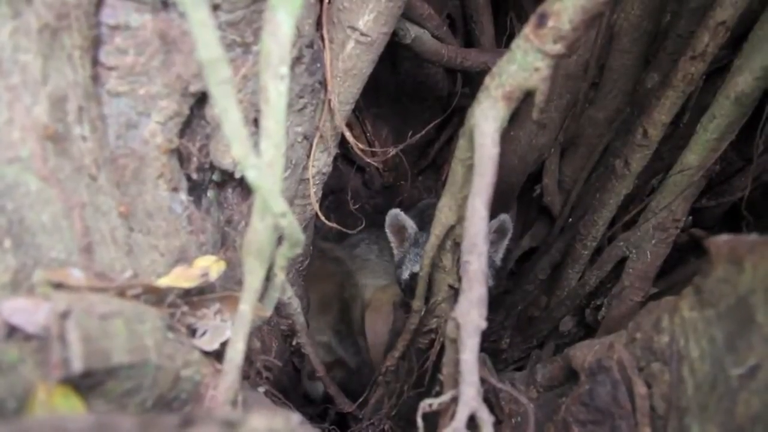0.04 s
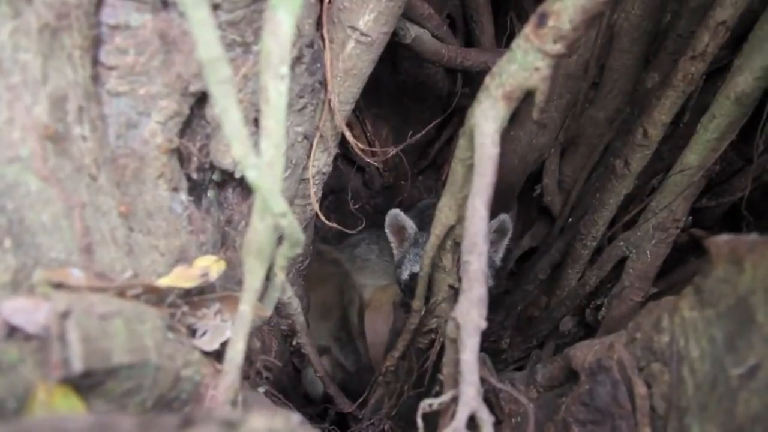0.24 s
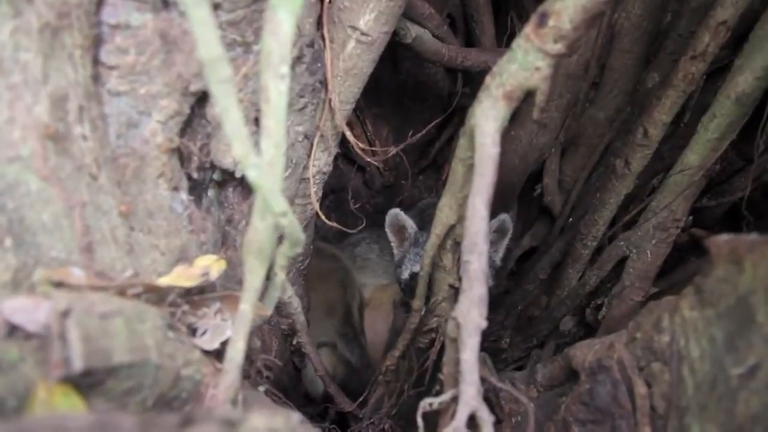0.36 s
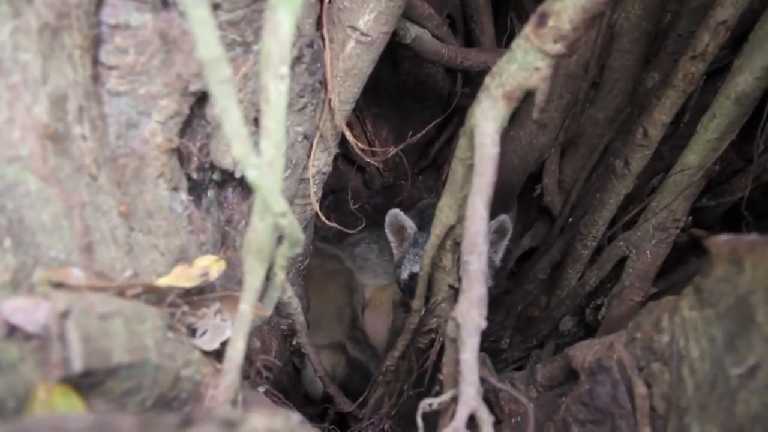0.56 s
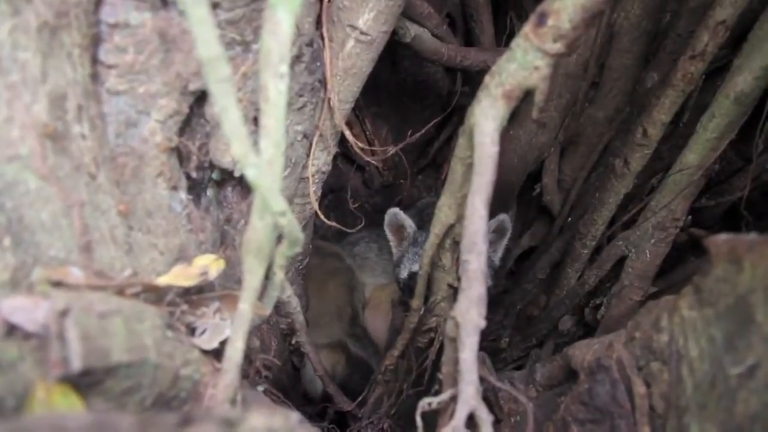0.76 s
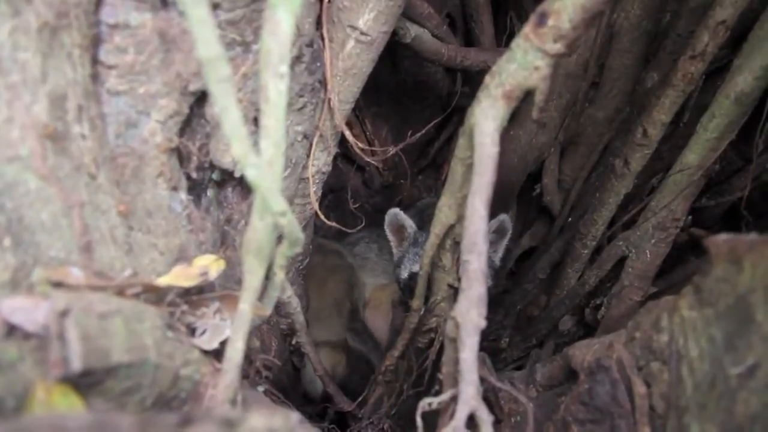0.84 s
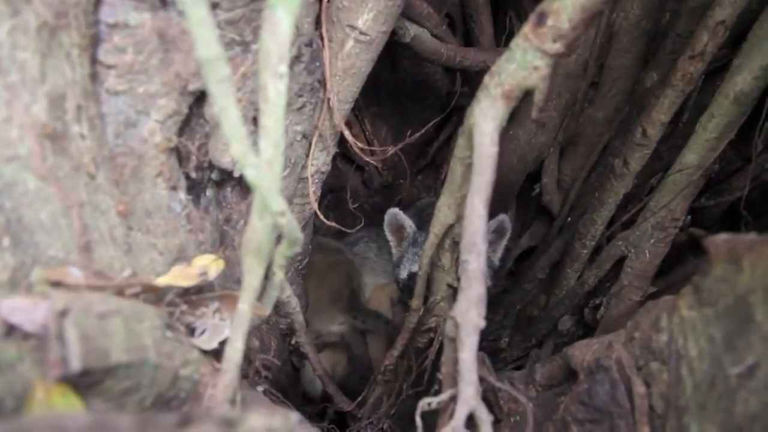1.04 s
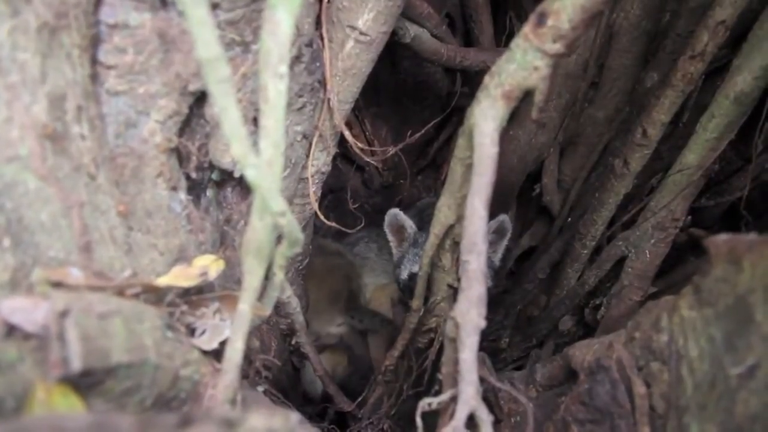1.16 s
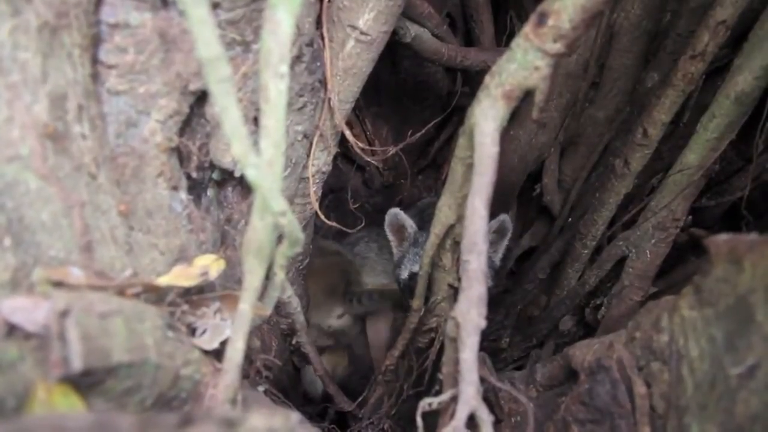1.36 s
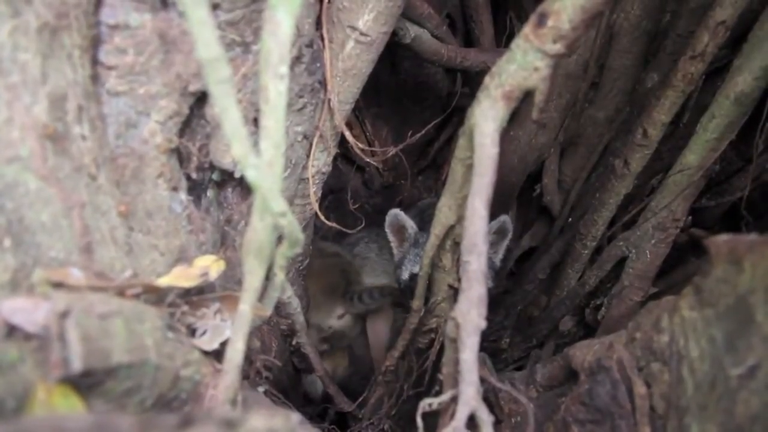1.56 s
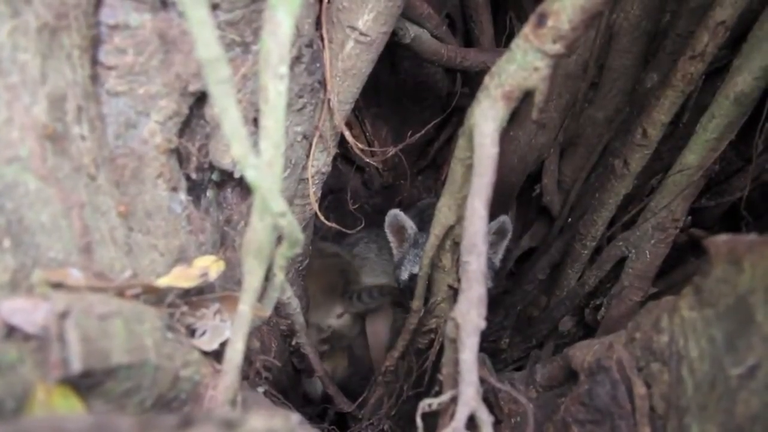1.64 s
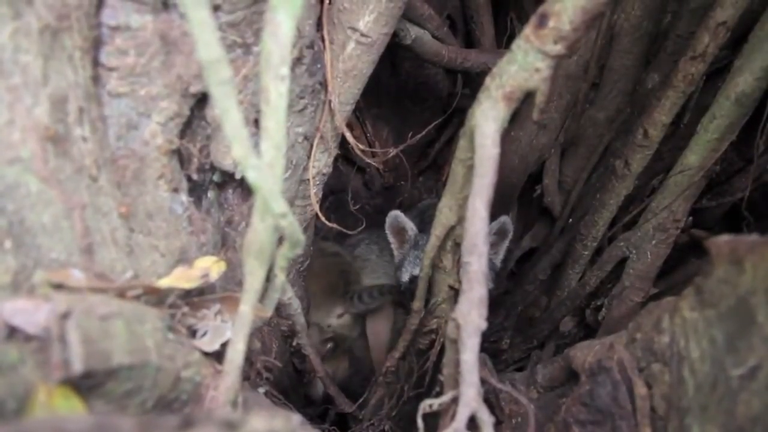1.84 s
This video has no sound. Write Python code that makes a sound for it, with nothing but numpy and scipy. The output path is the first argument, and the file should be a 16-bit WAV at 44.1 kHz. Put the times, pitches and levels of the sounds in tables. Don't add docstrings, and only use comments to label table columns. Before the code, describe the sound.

Small raccoon crying in a root den, clear at first and then hoarse and broken, with soft claw ticks and fur brushing; quiet forest and insects behind, a gap, then dry leaves scraping wood, mono camera microphone.

```python
import sys
import numpy as np
from scipy import signal
from scipy.io import wavfile
from scipy.ndimage import uniform_filter1d

SR = 44100
rng = np.random.default_rng(int(sys.argv[2]) if len(sys.argv) > 2 else 0)


def generate_wav(signal):
    frames = np.transpose(np.atleast_2d(signal))
    scaled = np.clip(frames, -1, 1) * 32767
    pcm = np.round(scaled).astype(np.int16)
    wavfile.write(sys.argv[1], SR, pcm)


def volts(x):
    e = np.asarray(x, float) / 20
    return 10 ** e


N = 83790


def rms_one(x):
    return x / np.sqrt(np.mean(x ** 2) + 1e-20)


def in_time(rows):
    s, *columns = np.transpose(rows)
    return [np.interp(np.arange(N) / SR, s, c) for c in columns]


def drift(rate_hz):
    r = np.exp(-2 * np.pi * rate_hz / SR)
    return rms_one(signal.lfilter([1], [1, -2 * r, r * r], rng.standard_normal(N + SR))[SR:])


def band(x, low_hz, high_hz, order=2):
    sos = signal.butter(order, [low_hz, min(high_hz, .45 * SR)], "band", fs=SR, output="sos")
    return signal.sosfilt(sos, x)


def window(start_s, length_s, edge_s):
    t = np.arange(N) / SR
    inside_s = np.minimum(t - start_s, start_s + length_s - t)
    return np.clip(inside_s / max(edge_s, 1e-4) + .5, 0, 1)


def bump(hz, centre_hz, width_hz):
    return 1 / (1 + (2 * (hz - centre_hz) / width_hz) ** 2)


def coloured(spectrum, patchy_db):
    out, edges_hz, points = 0, 22 * 2 ** np.arange(0, 10, .5), np.array(spectrum)
    together, white = drift(1.1), rng.standard_normal((2, N))
    for k, (low_hz, high_hz) in enumerate(zip(edges_hz, edges_hz[1:])):
        db = np.interp(np.log(low_hz * high_hz) / 2, np.log(points[:, 0]), points[:, 1])
        flicker_db = patchy_db * (1.64 * together + drift(30))
        out = out + volts(db + flicker_db) * band(white[k % 2], low_hz, high_hz)
    return rms_one(out)


def forest_floor():
    # f/Hz, level/(dB per Hz)
    floor_density = [(18, -45.5), (30, -3), (260, -8), (600, -12.5), (1400, -11), (5000, -22.5),
                     (8500, -24.5), (13000, -21)]
    return coloured(floor_density, patchy_db=1.6)


def insects(centre_hz):
    half_width_hz, throb_db = 360, 1
    noise = band(rng.standard_normal(N), centre_hz - half_width_hz, centre_hz + half_width_hz, order=3)
    return rms_one(noise * volts(throb_db * drift(41)))


def voice_breaks():
    # start/s, length/s, side lines/dB, chest tone/dB, rasp/(0-1)
    half_breaks = [
        (0.14, 0.045, -11, -57.5, 0.04),
        (0.192, 0.04, -16.5, -68, 0.25),
        (0.345, 0.015, -17, -67, 0.5),
        (1.048, 0.076, -4, -47, 0.11),
        (1.108, 0.05, -9, -60, 0.14),
        (1.17, 0.032, 0, -56.5, 0.03),
        (1.243, 0.047, -4.5, -52, 0.07),
    ]
    third_breaks = [
        (0.886, 0.03, -8.5, -37.5, 0.018),
        (0.92, 0.038, -10, -49.5, 0.2),
        (0.961, 0.054, 1, -35.5, 0.071),
        (1.033, 0.021, -6.5, -42.5, 0.2),
        (1.124, 0.038, -22, -45.5, 0.0955),
        (1.211, 0.03, -3.5, -45.5, 0.22),
        (1.3, 0.063, 0, -43, 0.2),
    ]
    edge_s = .01
    halves, thirds = (sum(volts(db) * window(s, d, edge_s) for s, d, db, _, _ in rows)
                      for rows in (half_breaks, third_breaks))
    half_chest, third_chest = (sum(volts(db) * window(s, d, edge_s) for s, d, _, db, _ in rows)
                               for rows in (half_breaks, third_breaks))
    rasp = .02 + sum(np.clip(1.6 * r, 0, .26) * window(s, d, edge_s)
                     for s, d, _, _, r in half_breaks + third_breaks)
    return halves, thirds, half_chest, third_chest, rasp


def tract_tone(pitch, phase, throat_db, mouth_db, mouth_hz, effort, halves, thirds, tired):
    # f/Hz, width/Hz, level/dB
    nose = [(3300, 1600, -12), (5200, 1200, -18)]
    # t/s, level/dB
    whistle_open = [(0, -75), (0.14, -71), (0.24, -55.5), (0.38, -58.5), (0.46, -58), (0.55, -60),
                    (0.63, -68), (0.67, -52), (0.76, -65), (0.9, -60.5), (0.97, -51), (1.02, -45.5),
                    (1.07, -44), (1.15, -61.5), (1.26, -56.5), (1.32, -80)]
    side_lines = (8, 9, 10, 14, 15, 16, 20)
    fresh_side_db = [-5.5, 6, 3, -2.5, -2.5, 3.5, 2]
    tired_side_db = [-1, 1.5, 9.5, -3.5, 4.5, 4.5, 2.5]
    whistle = volts(in_time(whistle_open)[0])
    line_db = {k: fresh + tired * (late - fresh)
               for k, fresh, late in zip(side_lines, fresh_side_db, tired_side_db)}
    nose_drive = (effort * 30) ** .73
    throat, mouth, nasal = np.zeros((3, N))
    throat_power, mouth_power = np.full((2, N), 1e-12)
    for k in range(8, 72):
        if k % 6 in (1, 5):
            continue
        hz = pitch * k / 6
        whole = k % 6 == 0
        share = 1 if whole else halves if k % 3 == 0 else thirds
        shimmer_db = 2.5 if whole else 2.5 * 1.7
        share = share * volts(shimmer_db * drift(14))
        wave = share * np.sin(phase * k / 6 + rng.uniform(0, 2 * np.pi))
        if k > 15:
            gain = bump(hz, mouth_hz, 820) + nose_drive * sum(volts(db) * bump(hz, f, w) for f, w, db in nose)
            gain = gain * volts((0 if whole else -0.5) + line_db.get(k, 0))
            mouth += gain * wave
            mouth_power += (gain * share) ** 2 / 2
        else:
            gain = bump(hz, 2010, 860) * volts(line_db.get(k, 0))
            throat += gain * wave
            throat_power += (gain * share) ** 2 / 2
        nasal += whistle * bump(hz, 9310, 1100) * wave
    return volts(throat_db) * throat / np.sqrt(throat_power) + volts(mouth_db) * mouth / np.sqrt(mouth_power) + nasal


def chest_tone(phase, rasp, tired, half_chest, third_chest):
    shake = 6.0 * rasp * drift(49)
    overtone = .04 + 2.0 * rasp * tired
    third = np.sin(phase / 3 + shake) + overtone * np.sin(phase * 2 / 3 + shake)
    half = np.sin(phase / 2 + shake)
    return np.sqrt(2) * (third_chest * third + half_chest * half) * volts(3.0 * drift(25))


def throat_air(phase, effort, rasp):
    # f/Hz, level/(dB per Hz)
    air_density = [(240, -51), (400, -28.5), (1560, -15), (3200, -23), (5300, -25.5), (7600, -36.5),
                   (9600, -21), (15500, -29.5)]
    flow = (uniform_filter1d(effort, size=2000) * 30) ** 0.95
    pulse = (1 + rasp) * (1 + np.sin(phase))
    return volts(-49) * flow * pulse * coloured(air_density, patchy_db=4.0)


def voice():
    # t/s, pitch/Hz, fundamental/dB, throat/dB, mouth/dB, mouth
    # resonance/Hz
    wail_line = [(0.0, 907, -44.5, -47.5, -54.5, 2670), (0.04, 917, -52, -50, -58, 2860),
                 (0.1, 986, -44, -43, -57.5, 3100), (0.138, 1074, -46, -51.5, -50, 3560),
                 (0.152, 1054, -41.5, -42, -47.5, 3430), (0.205, 1046, -43.5, -41, -48, 3580),
                 (0.218, 1075, -42.5, -54, -59.5, 3450), (0.232, 1144, -31, -39.5, -44, 3460),
                 (0.252, 1164, -37, -34.5, -44, 3460),
                 (0.276, 1129, -36.5, -45.5, -53.5, 3548), (0.3, 1139, -35.5, -45, -54.5, 3470),
                 (0.335, 1133, -37.5, -47.5, -57.5, 3500), (0.352, 1100, -39.5, -48.5, -53, 3400),
                 (0.395, 1100, -38, -50.5, -56.5, 3293),
                 (0.41, 1055, -44.5, -40.5, -45, 3540), (0.5, 998.5, -48.5, -39, -50.5, 3320),
                (0.529, 992.3, -52.5, -37, -50, 3290), (0.56, 973, -48.5, -32.5, -61.5, 2980),
                (0.6, 965.5, -50, -34, -46, 2900), (0.665, 930.5, -52, -35.5, -39.5, 2800),
                (0.715, 922, -56, -42.5, -43.5, 2727), (0.745, 895, -50.5, -41.5, -42.5, 2800),
                (0.765, 884, -50.5, -47, -44.5, 2810),
                 (0.796, 894, -47.5, -43.5, -48, 2900), (0.816, 905.5, -56, -41, -37, 3000),
                (0.854, 953.6, -51, -28.5, -41.5, 2862), (0.871, 938.3, -49, -28.5, -36, 2900),
                (0.928, 971.4, -48, -24.5, -36.5, 3147), (0.937, 949.5, -44.5, -35, -30.5, 3150),
                (0.948, 981, -49, -21.5, -35.5, 3170), (0.975, 941.6, -48, -24, -27.5, 3170),
                (1.005, 936.6, -54.5, -28, -29.5, 3300),
                 (1.012, 1009, -43, -37.5, -31.5, 3533), (1.031, 1028, -43.5, -34.5, -31.5, 3843),
                 (1.057, 947, -49, -30.5, -32.5, 3390), (1.091, 909.4, -48.5, -38, -29, 3480),
                 (1.119, 942.3, -46, -36.5, -33.5, 3481),
                 (1.137, 910.7, -50, -42.5, -33, 2940), (1.166, 900, -51, -47, -28.5, 2995),
                 (1.178, 878.4, -42.5, -44.5, -36.5, 2900), (1.199, 887.5, -47, -51, -31.5, 2800),
                 (1.224, 897.8, -47.5, -39.5, -33.5, 3100), (1.251, 882, -41.5, -44, -33.5, 3270),
                 (1.296, 880, -47.5, -46, -35, 3290), (1.321, 869, -44.5, -38, -35, 2800),
                 (1.334, 815, -41, -43.5, -43, 2580)]
    rasp_hz, tired_s = 130, 1.17
    phrases = wail_line
    pitch, low_db, throat_db, mouth_db, mouth_hz = in_time(phrases)
    halves, thirds, half_chest, third_chest, rasp = voice_breaks()
    wobble = 1 + .003 * drift(27.28)
    phase = 2 * np.pi * np.cumsum(pitch * wobble) / SR + rasp * drift(rasp_hz) / 2
    effort = np.sqrt(volts(throat_db) ** 2 + volts(mouth_db) ** 2)
    tired = window(tired_s, 1, .05)
    upper = tract_tone(pitch, phase, throat_db, mouth_db, mouth_hz, effort, halves, thirds, tired)
    upper += chest_tone(phase, rasp, tired, half_chest, third_chest)
    flutter = volts(1.0 * drift(35))
    swell = 1 + .45 * rasp * drift(rasp_hz)
    tone = upper * flutter * swell + np.sqrt(2) * volts(low_db) * np.sin(phase)
    return (tone + throat_air(phase, effort, rasp)) * window(-1, 2.33, 0.027)


def echoes(x):
    level_db, t60_s = -24, .2
    tail = rng.standard_normal(SR // 2) * volts(-60 * np.arange(SR // 2) / SR / t60_s)
    return x + volts(level_db) * signal.fftconvolve(x, tail / np.sqrt(np.sum(tail ** 2)))[:N]


def paws():
    # t/s, tick/dB, thud/dB, thud f/Hz
    touches = [(0.18, -49, -46.5, 302), (0.209, -81.5, -45, 335), (0.252, -46.5, -41, 263),
               (0.303, -67, -45.5, 171), (0.35, -50.5, -55, 267.8), (0.385, -69, -47, 257),
               (0.474, -46.5, -71, 242.3), (0.556, -64, -55, 151.8), (0.783, -70.5, -50.5, 243),
               (0.926, -70, -40.5, 245), (1.053, -72.5, -43.5, 220.1), (1.091, -59, -42.5, 157),
               (1.121, -69, -36.5, 205), (1.277, -66, -45, 198), (1.343, -60, -33, 226),
               (1.65, -44, -73, 298), (1.869, -46.5, -74, 300)]
    tick_s, thud_cycles = .009, 4.66
    t, out = np.arange(N) / SR, np.zeros(N)
    noise = band(rng.standard_normal(N), 1500, 16000, order=1)
    for s, tick_db, thud_db, hz in touches:
        age = np.maximum(t - s, 0)
        out += volts(tick_db) * 5 * age / tick_s * np.exp(-2 * age / tick_s) * noise
        swell = age * hz * thud_cycles / 4
        out += volts(thud_db) * np.e * swell * np.exp(-swell) * np.sin(2 * np.pi * hz * age)
    return out


def fur():
    # start/s, length/s, level/dB
    brushes = [
        (0.553, 0.042, -50.5),
        (0.591, 0.039, -52.5),
        (0.693, 0.052, -51),
        (0.818, 0.04, -52.5),
        (0.932, 0.087, -43),
        (1.014, 0.16, -45.5),
        (1.229, 0.031, -55),
    ]
    noise = band(rng.standard_normal(N), 2900, 14080, order=1)
    hiss = rms_one(noise) * volts(0.61 * drift(45))
    return hiss * sum(volts(db) * window(s, d, .03) for s, d, db in brushes)


def scrape():
    # t/s, level/dB, extra upper ring/dB, extra low ring/dB
    stroke = [(1.617, -88.5, 20, -8), (1.635, -66.5, 19.5, -13.5), (1.665, -51.5, 10, -4),
              (1.7, -41, -3.5, -0.5), (1.75, -44, -11, -6), (1.775, -48.5, -2, -19),
              (1.86, -55.5, -0.5, -28), (1.878, -51, 6, -7), (1.9, -43.5, -5.5, 10)]
    # f/Hz, width/Hz, level/dB
    wood = [(630, 67, -2), (1463, 224, 8), (1840, 810, 11), (2800, 330, 6), (4920, 2100, -3.5),
            (10320, 3400, -5)]
    grains_per_s, grain_spread_db = 3800, -1
    hits = rng.random(N) < grains_per_s * volts(3.0 * drift(60)) / SR
    grains = hits * volts(grain_spread_db * rng.exponential(1, N)) * rng.choice([-1, 1], N)
    stroke_db, upper_db, low_db = in_time(stroke)
    rings = [volts(db) * rms_one(band(grains + 1e-18, f - w / 2, f + w / 2, order=1)) for f, w, db in wood]
    low, *middle, upper, leaf, edge = rings
    return volts(stroke_db - 13) * (volts(low_db) * low + sum(middle) + volts(upper_db) * upper + leaf + edge)


def scene():
    fade_start_s, fade_end_s, in_start_s, in_end_s = 1.378, 1.457, 1.617, 1.665
    insect_hz, insect_2_hz = 6240, 6430
    t = np.arange(N) / SR
    first = np.clip((fade_end_s - t) / (fade_end_s - fade_start_s), 0, 1)
    second = np.clip((t - in_start_s) / (in_end_s - in_start_s), 0, 1)
    floor = forest_floor()
    chorus = insects(insect_hz) + volts(-16) * insects(2 * insect_hz)
    den = echoes(voice()) + volts(-54) * floor + volts(-47.5) * chorus
    leaves = volts(-70) * floor + volts(-61) * insects(insect_2_hz)
    touch = paws() + fur()
    mono = first * den + second * leaves + (first + second) * touch + (t > in_start_s) * scrape()
    return np.array([mono, mono])


def low_pass(x):
    return signal.sosfilt(signal.butter(12, 15820, fs=SR, output="sos"), x)


def record(dry):
    x = signal.sosfilt(signal.butter(2, 115, "high", fs=SR, output="sos"), dry)
    x = signal.sosfilt(signal.butter(2, 13100, fs=SR, output="sos"), x)
    x = signal.sosfilt(signal.cheby2(12, 60, 16400, fs=SR, output="sos"), x)
    return low_pass(x)


dry = scene()
out = record(dry)
generate_wav(out)
```